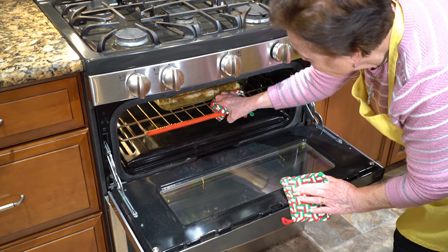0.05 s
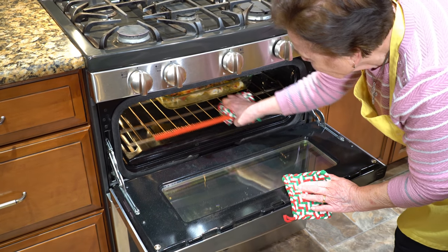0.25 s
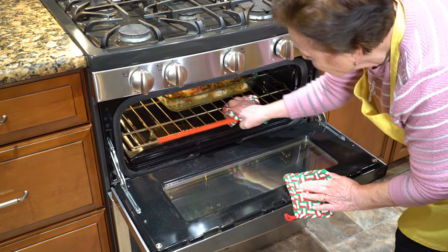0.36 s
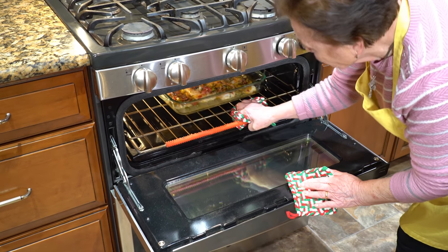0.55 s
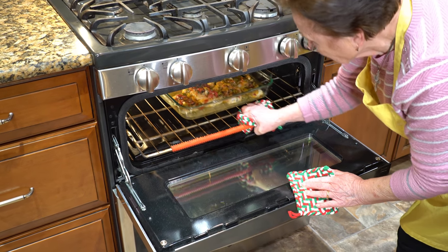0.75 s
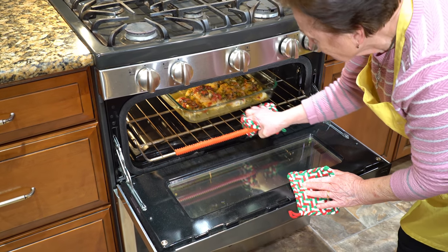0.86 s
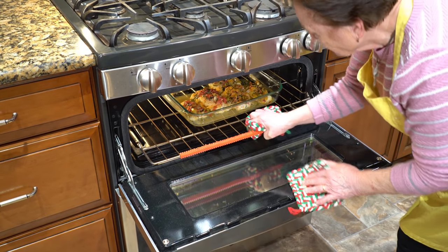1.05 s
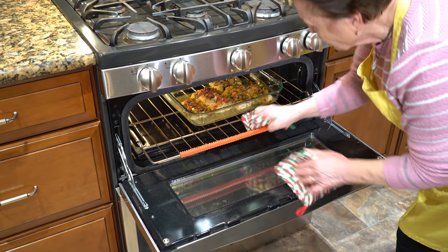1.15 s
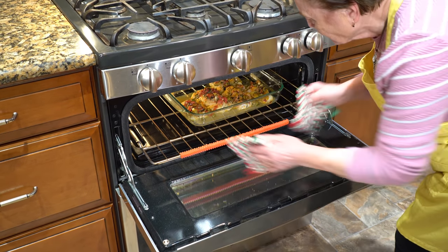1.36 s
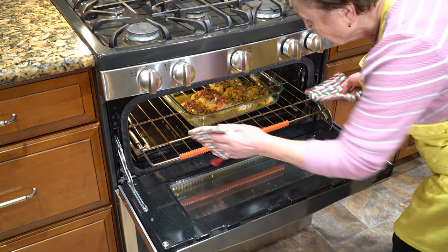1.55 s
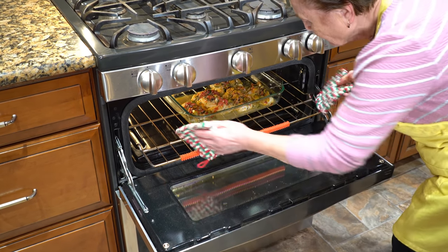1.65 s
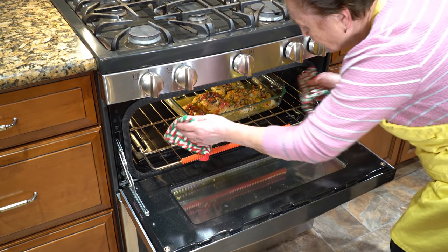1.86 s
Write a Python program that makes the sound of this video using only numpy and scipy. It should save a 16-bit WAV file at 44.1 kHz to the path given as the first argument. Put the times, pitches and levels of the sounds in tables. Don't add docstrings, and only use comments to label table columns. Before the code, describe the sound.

A wire oven rack scrapes out along metal runners in two pulls, knocking and rattling

```python
import sys
import numpy as np
from scipy import signal
from scipy.fft import rfft, irfft, next_fast_len
from scipy.io import wavfile
from scipy.ndimage import map_coordinates

SR = 44100
rng = np.random.default_rng(int(sys.argv[2]) if len(sys.argv) > 2 else 0)


def gain_from_db(level_db):
    decades = np.asarray(level_db, float) / 20
    return 10 ** decades


def log_audio(samples):
    frames = np.atleast_2d(samples).T
    limited = np.clip(frames, -1, 1)
    pcm = np.round(limited * 32767).astype(np.int16)
    wavfile.write(sys.argv[1], SR, pcm)


N = 83790
RING_TIME_S = np.arange(SR // 2) / SR


def unit(x):
    return x / np.sqrt(np.mean(x ** 2) + 1e-20)


def along(points, hz):
    point_hz, value = np.transpose(points)
    return np.interp(np.log(hz + 1), np.log(point_hz + 1), value)


def curves(rows):
    start_s, level_db, *others = np.transpose(rows)
    t = np.arange(N) / SR
    level = np.interp(t, start_s, level_db, -120, -120)
    return level, *[np.interp(t, start_s, column) for column in others]


def wobble(rate):
    knot = np.arange(N) * np.clip(rate, 0, 200) / SR
    return map_coordinates(rng.standard_normal(400), [knot])


def filtered(x, response):
    size = next_fast_len(N + SR // 2)
    return irfft(rfft(x, size) * response(np.fft.rfftfreq(size, 1 / SR)), size)[:N]


def coloured(x, spectrum):
    return unit(filtered(x, lambda hz: gain_from_db(along(spectrum, hz))))


def resonant(x, peaks):
    def response(f):
        total = 0
        for k, (centre, width, db) in enumerate(peaks):
            damping = 1j * f * width
            total = total + (-1) ** k * gain_from_db(db) * damping / (centre ** 2 - f ** 2 + damping)
        return total
    return filtered(x, response)


def grit(per_s, spread_db, hiss):
    contact = rng.random(N) < per_s / SR
    size = gain_from_db(spread_db * np.minimum(rng.exponential(size=N), 3))
    hits = contact * size * rng.standard_normal(N)
    return unit(unit(hits) + hiss * rng.standard_normal(N))


def ring(modes, attack_s):
    t = RING_TIME_S
    total = 0
    for hz, db, t60 in modes:
        decay = gain_from_db(db + rng.normal(0, 1) - 60 * t / t60)
        total = total + decay * np.sin(2 * np.pi * hz * t)
    return (1 - np.exp(-t / attack_s)) * total


def placed(events):
    out = np.zeros(N + SR)
    for start_s, sound in events:
        out[round(start_s * SR):][:len(sound)] += sound
    return out[:N]


def kitchen_air():
    # hz, level_db
    air_spectrum = [(20, -4.5), (40, 2.5), (72, 3), (200, -8.5), (870, -12), (1500, -21.5), (3000, -22),
                    (15600, -34.5)]
    return gain_from_db(-68 + 1.2 * wobble(5)) * coloured(rng.standard_normal(N), air_spectrum)


def kitchen(x):
    # hz, t60_s
    room_decay = [(100, .2), (1000, .22), (10000, .13)]
    hz, t, z = signal.stft(rng.standard_normal(SR // 2), SR, nperseg=256)
    decay = gain_from_db(-60 * t / along(room_decay, hz)[:, None])
    tail = signal.istft(z * decay, SR, nperseg=256)[1]
    delayed = np.pad(x, (300, 0))
    return signal.fftconvolve(delayed, tail / np.linalg.norm(tail))[:N]


def cooling_ticks():
    # start_s, level_db
    tick_events = [
        (1.259, -60),
        (1.288, -62),
        (1.304, -66),
    ]
    modes = [(11800 * k, 0, .012) for k in (.87, .96, 1.07)]
    return placed([(s, gain_from_db(db) * ring(modes, 0.00084)) for s, db in tick_events])


def cloth():
    # start_s, rustle_db, fold_weight_db
    handling = [
        (1.17, -71, 8),
        (1.192, -70, 0),
        (1.26, -59.5, 0.5),
        (1.272, -65, 5),
        (1.362, -58, -0.5),
        (1.392, -64, 2.5),
        (1.628, -73, -5.5),
        (1.78, -74, 0.5),
        (1.9, -67, -3.5),
    ]
    # hz, level_db
    fibre_spectrum = [(350, -91), (600, -2.5), (634, -6), (1760, -8.5), (2310, -12), (4690, -15.5),
                      (15600, -31)]
    # hz, level_db
    fold_spectrum = [(24, -71), (40, -0.5), (249, -5.5), (301, -3), (368, -6), (800, -19.5), (1040, -39),
                     (1760, -120)]
    rustle_db, fold_db = curves(handling)
    fibres = coloured(grit(1200, spread_db=2, hiss=1.7), fibre_spectrum) * gain_from_db(.8 * wobble(40))
    fold_level = gain_from_db(fold_db + 3 + 1.4 * wobble(25))
    folds = coloured(grit(800, spread_db=2, hiss=1.3), fold_spectrum) * fold_level
    return gain_from_db(rustle_db) * (fibres + folds)


def bumps():
    # start_s, level_db, pitch_hz
    soft_contacts = [(0.029, -56, 68), (.085, -64, 69.4), (0.206, -46.5, 100), (0.255, -25.5, 114),
                     (0.802, -35, 103), (1.089, -39.5, 85.5), (1.24, -42, 320), (1.282, -41, 294),
                     (1.64, -54, 152), (1.651, -48, 336), (1.666, -54, 109), (1.68, -47.5, 164),
                     (1.7, -54, 130), (1.877, -47, 400)]
    events = []
    for start_s, db, hz in soft_contacts:
        t60 = 14 / hz
        modes = [(hz, 0, t60), (1.4 * hz, -9, t60 / 2)]
        events.append((start_s, gain_from_db(db) * ring(modes, .005)))
    return placed(events)


def singing_wires():
    # start_s, level_db, pitch_hz, t60_s
    sung_notes = [
        (.265, -34, 2950, 0.089),
        (.385, -47, 3050, 0.087),
        (0.523, -46.5, 2616, 0.24),
        (1.09, -66, 2210, 0.49),
        (1.08, -58.5, 889, 0.35),
        (1.17, -75, 6260, 0.36),
        (1.31, -76, 13800, .2),
    ]
    events = []
    for start_s, db, hz, t60 in sung_notes:
        modes = [(hz, 0, t60), (1.012 * hz, -7, t60)]
        events.append((start_s, gain_from_db(db) * ring(modes, .006)))
    return placed(events)


def knocks():
    # start_s, peak_db, boom_db, crack_db
    ridge_blows = [(0.215, -37, -6, -2), (0.2589, -34, 21, 22), (0.283, -17.5, 3, 7), (0.29, -19, 7, -2),
                   (0.303, -40, 22, 4), (0.3257, -14, 1, -21), (0.332, -28, 4, 10), (0.37, -41, 22, -18),
                   (.377, -55, -19, -4), (.3833, -26, 8, 1), (.4, -27, 3.5, -18), (.5544, -15.5, 3.5, 0.5),
                   (0.5892, -14, 1.5, 3), (0.6006, -29, -12, 6.5), (0.7271, -24, 1, 0),
                   (0.925, -37.5, 10.5, 14), (1.034, -35, -6, 2)]
    # pitch_hz, level_db, t60_s
    box_modes = [(86, -11, .14), (120, -9, .05), (160, -6, .05)]
    # pitch_hz, level_db, t60_s
    panel_modes = [(290, -9, .045), (380, 0, .065), (450, 3, .012), (530, -8, .025), (670, -7, .022),
                   (900, -12, .015)]
    # hz, level_db
    crack_spectrum = [(590, -14), (1000, -2.5), (2880, -9.5), (3700, -14.5), (5110, -11.5), (15600, -26)]
    t = RING_TIME_S
    crack_decay = gain_from_db(-60 * t / .03) + .1 * gain_from_db(-60 * t / .12)
    bodies, cracks = [], []
    for start_s, db, boom_db, crack_db in ridge_blows:
        boom = gain_from_db(boom_db) * ring(box_modes, 0.0024)
        panel = ring(panel_modes, 0.0018)
        bodies.append((start_s, gain_from_db(db - 6.5) * (boom - panel)))
        cracks.append((start_s, gain_from_db(db - 26 + crack_db) * crack_decay))
    wires = coloured(grit(5000, spread_db=2, hiss=1.2), crack_spectrum)
    return placed(bodies) + placed(cracks) * wires


def pull(stroke, scrape, wires, wire_db, sheet_db, box_db):
    # pitch_hz, width_hz, level_db
    sheet_peaks = [(258, 28, 0), (369.5, 63, -3), (419.8, 17.7, 1), (522, 74, 0.5), (601, 32.5, -2),
                   (637, 60, -8.5), (894, 62, -18.5)]
    # pitch_hz, width_hz, level_db
    box_peaks = [(86, 40, 0), (118, 45, 0), (160, 50, -4)]
    load_max_db = 5
    friction_db, sheet_load_db, box_load_db = curves(stroke)
    rough = grit(5000, spread_db=1, hiss=.9) * gain_from_db(0.68 * wobble(40.23))
    force = gain_from_db(friction_db) * rough
    hiss = gain_from_db(friction_db) * coloured(rough, scrape)
    sing = 0
    for k in range(4):
        group = [(hz, max(width, 45), db) for hz, width, db in wires[k::4]]
        sing = sing + resonant(force * gain_from_db(2.5 * wobble(30)), group)
    sheet_force = gain_from_db(friction_db + np.minimum(sheet_load_db, load_max_db))
    sheet = resonant(sheet_force * grit(1500, spread_db=-0.5, hiss=0.85), sheet_peaks)
    box_force = gain_from_db(friction_db + np.minimum(box_load_db, load_max_db))
    box = resonant(box_force * rng.standard_normal(N), box_peaks)
    return hiss + gain_from_db(wire_db) * sing + gain_from_db(sheet_db) * sheet + gain_from_db(box_db) * box


def sliding_rack():
    # start_s, friction_db, panel_load_db, box_load_db
    first_stroke = [
        (0.18, -86, 10, 16),
        (0.228, -52, 3.5, -1),
        (0.268, -42, -1, -6),
        (0.324, -38.5, -2, -39),
        (0.366, -45, 0, -6),
        (0.39, -44, 8.5, -21),
        (0.402, -54.5, 2, 6.5),
        (0.45, -54, 7.5, 35),
    ]
    first_stroke_end = [
        (0.45, -54, 3, 8),
        (0.486, -56.5, 3.5, 15),
        (0.562, -42, -5.5, -16),
        (0.578, -50, 9.5, -9),
        (0.592, -47, -7.5, 27),
        (0.624, -58.5, 7, 13),
        (0.68, -62.5, 8, -8),
        (0.69, -74, 11, -3),
    ]
    second_stroke = [
        (0.685, -63, 5, 21),
        (0.741, -50, 1.5, -3),
        (0.859, -49.5, -3, -4),
        (1.065, -56.5, 1.5, -6.5),
        (1.107, -70.5, 6.5, 10),
        (1.2, -77, 1, -12),
    ]
    # hz, level_db
    first_scrape = [(350, -43), (600, -16), (767, -11), (1060, -3.5), (1250, -9), (2990, -13),
                    (15600, -35.5)]
    second_scrape = [(350, -50), (600, -8), (756, -8.5), (1020, -3), (1220, -11), (4040, -13), (15600, -31)]
    # pitch_hz, width_hz, level_db
    first_wires = [(1045, 82, -17), (1390, 40, -23), (1985, 49, -6), (2303, 32, -11), (2927, 36, 0),
                   (3063, 50, 0), (3620, 50, 1), (3870, 85, -6), (5300, 45, -15), (5600, 120, -16.5),
                   (6840, 130, -18), (9600, 240, -28)]
    second_wires = [(1030, 60, -4), (1380, 60, -2), (1520, 70, -5), (1860, 75, -5), (2200, 50, -6),
                    (3020, 55, -6), (3440, 55, -7), (4020, 55, -6), (5050, 90, -14), (6100, 70, -14),
                    (7010, 80, -20), (8360, 100, -22), (9400, 150, -19)]
    first = pull(first_stroke, first_scrape, first_wires, wire_db=15.5, sheet_db=24, box_db=30.5)
    first_end = pull(first_stroke_end, first_scrape, first_wires, wire_db=10, sheet_db=25, box_db=26)
    second = pull(second_stroke, second_scrape, second_wires, wire_db=17.5, sheet_db=25.5, box_db=30.5)
    return first + first_end + second


def scene():
    low_cut_hz = 45
    oven = filtered(sliding_rack() + knocks(), lambda f: (1j * f / (low_cut_hz + 1j * f)) ** 2)
    near = oven + bumps() + singing_wires() + cooling_ticks() + cloth()
    return (near + gain_from_db(-14) * kitchen(near) + kitchen_air())[None]


def roll_off(x):
    return signal.sosfilt(signal.butter(12, 15700, fs=SR, output="sos"), x)


def record(dry):
    mix = filtered(dry[0], lambda f: f < 15750)[None]
    return roll_off(mix)


dry = scene()
out = record(dry)
log_audio(out)
```